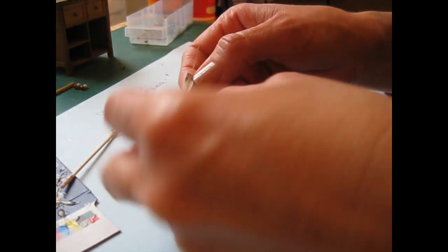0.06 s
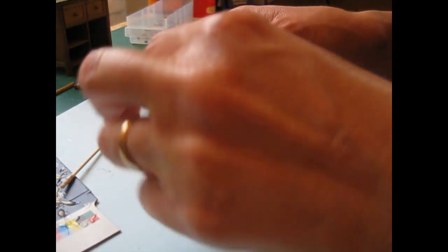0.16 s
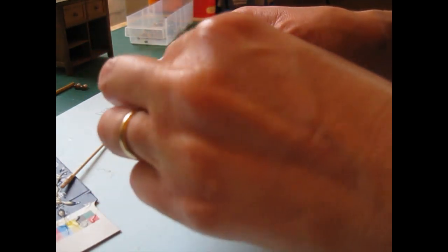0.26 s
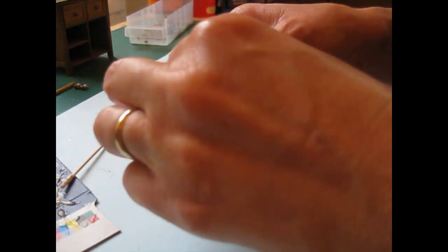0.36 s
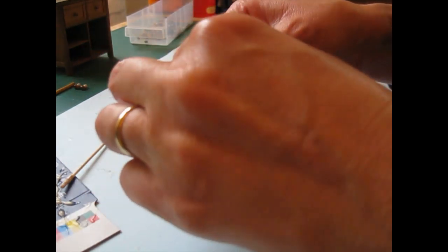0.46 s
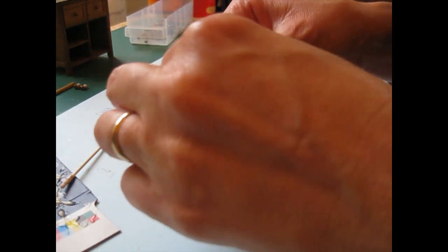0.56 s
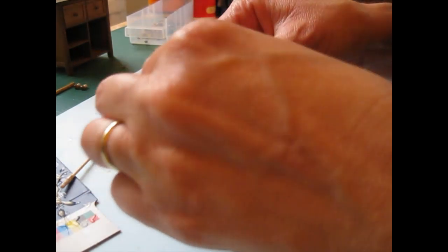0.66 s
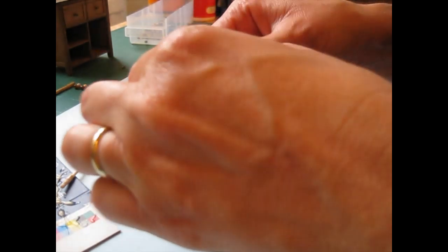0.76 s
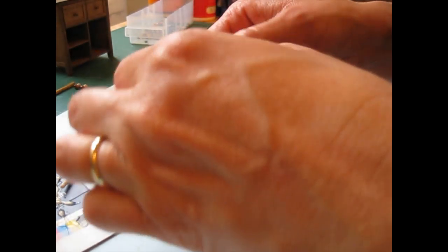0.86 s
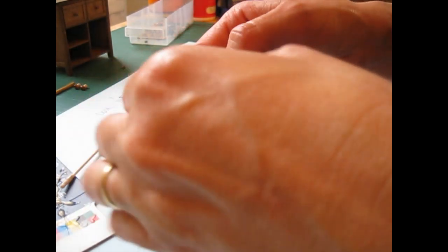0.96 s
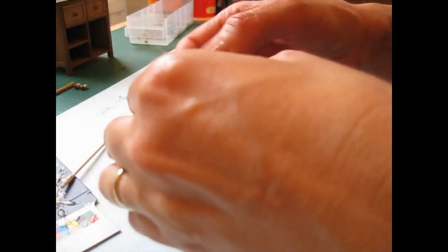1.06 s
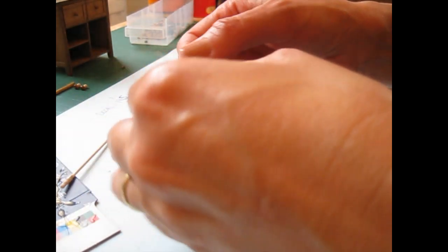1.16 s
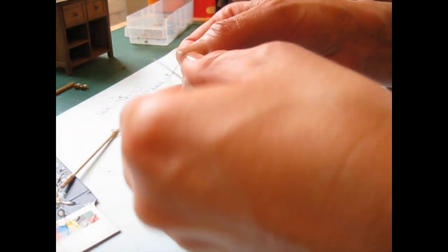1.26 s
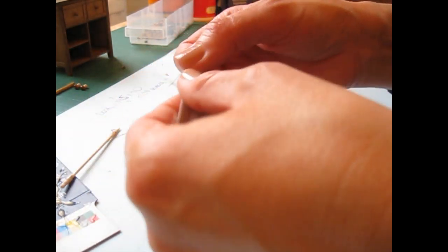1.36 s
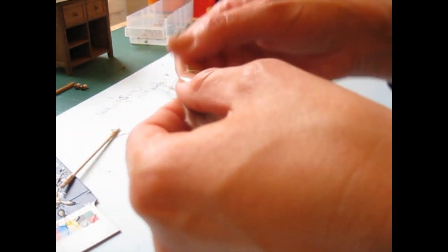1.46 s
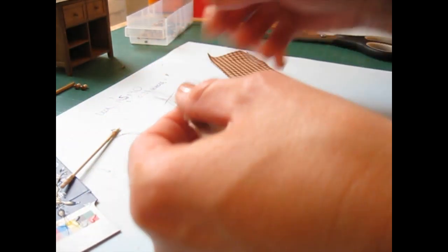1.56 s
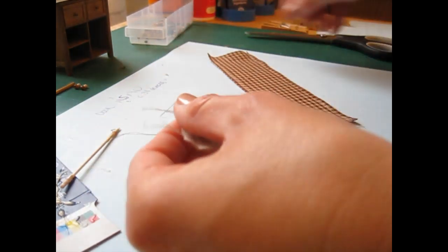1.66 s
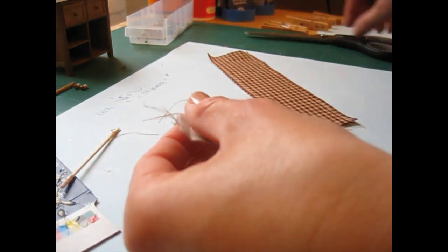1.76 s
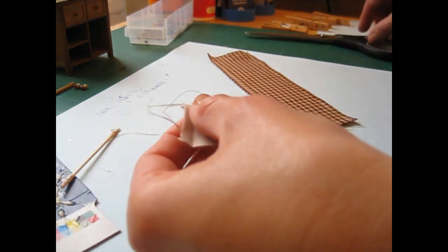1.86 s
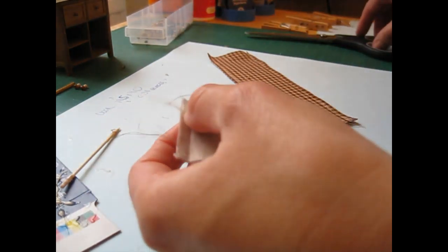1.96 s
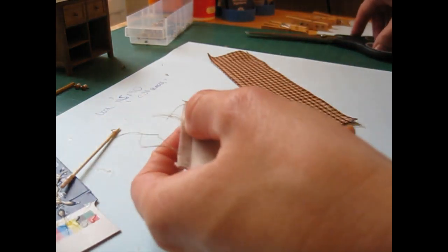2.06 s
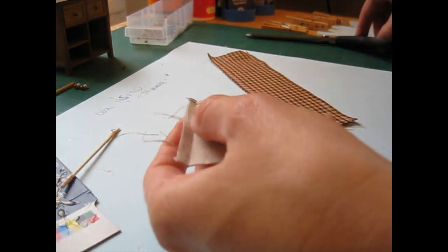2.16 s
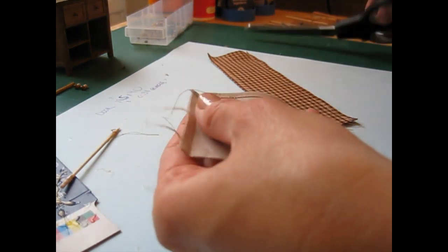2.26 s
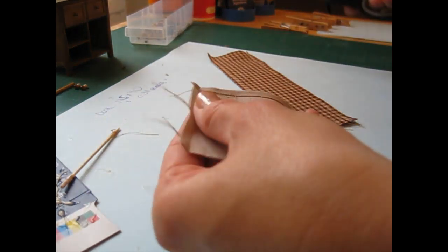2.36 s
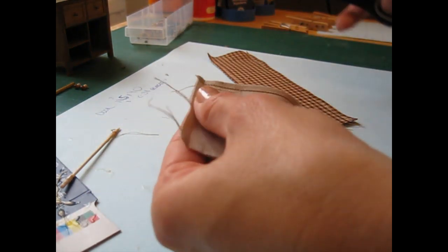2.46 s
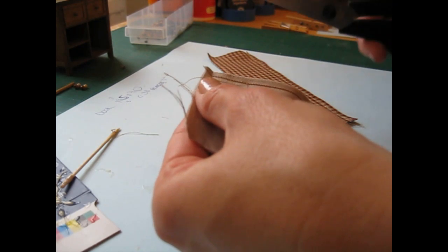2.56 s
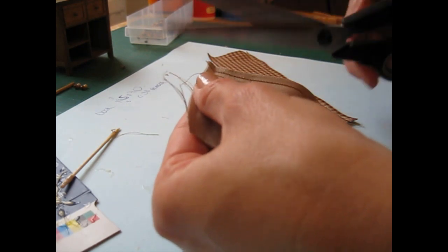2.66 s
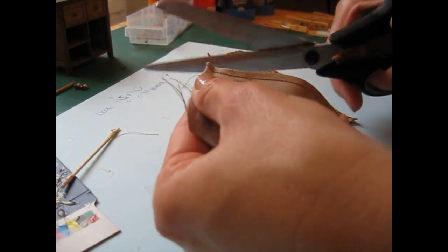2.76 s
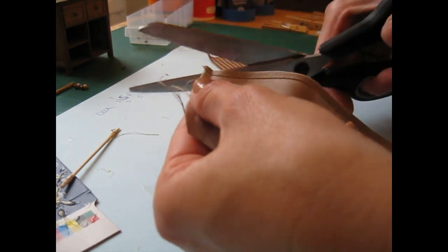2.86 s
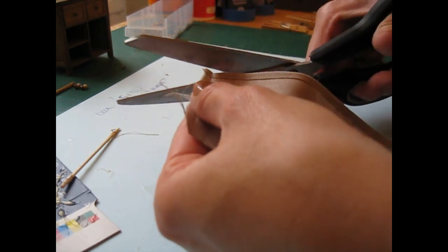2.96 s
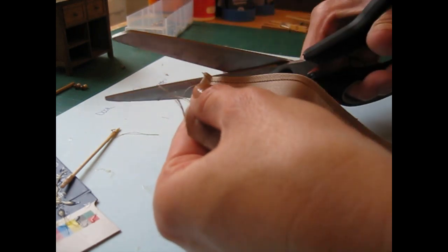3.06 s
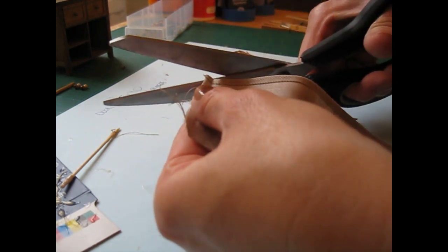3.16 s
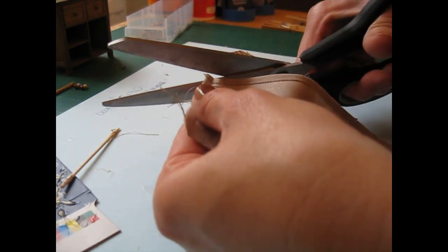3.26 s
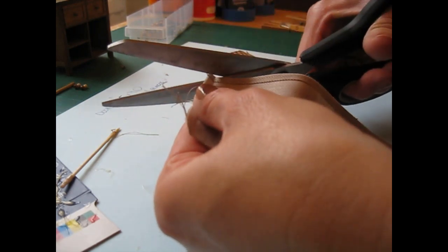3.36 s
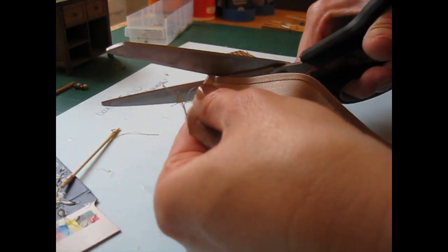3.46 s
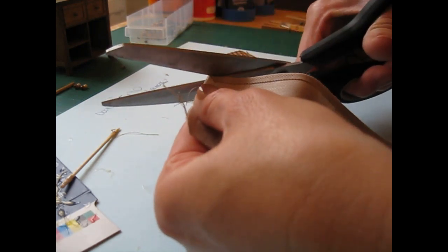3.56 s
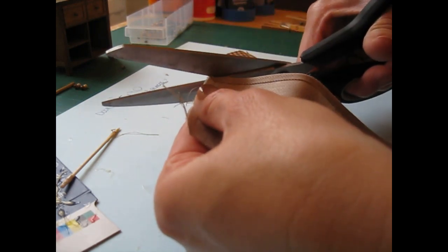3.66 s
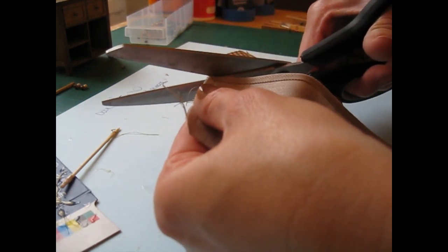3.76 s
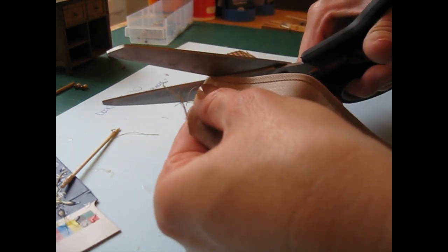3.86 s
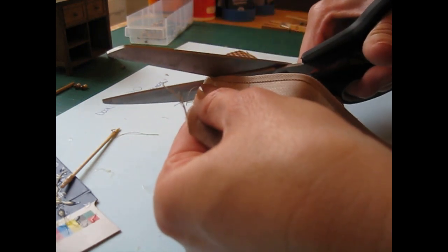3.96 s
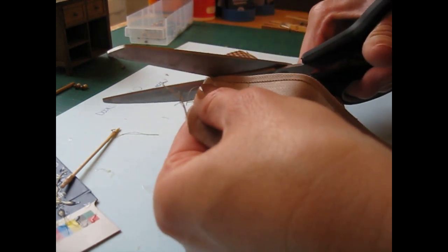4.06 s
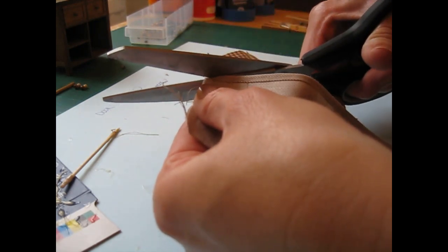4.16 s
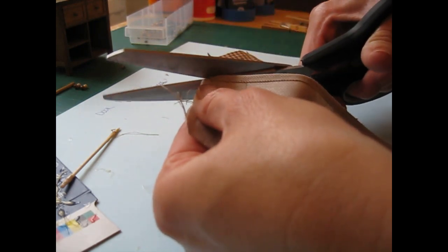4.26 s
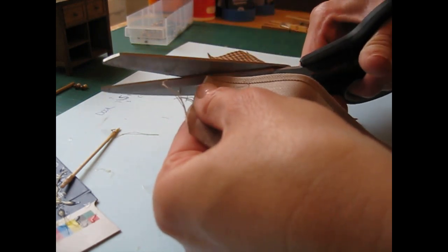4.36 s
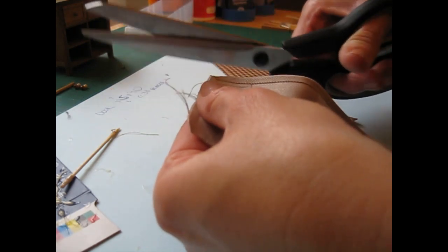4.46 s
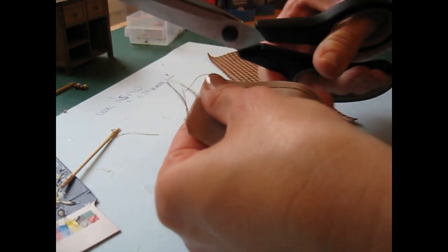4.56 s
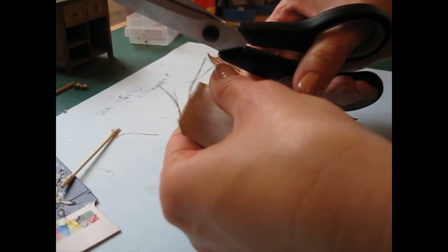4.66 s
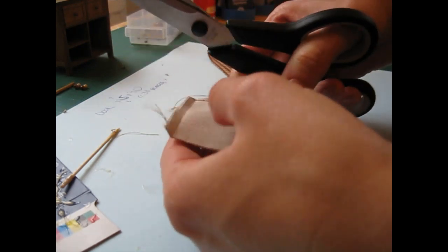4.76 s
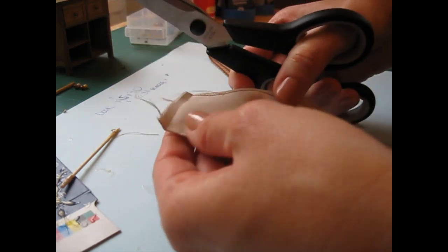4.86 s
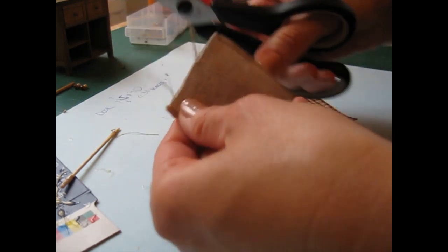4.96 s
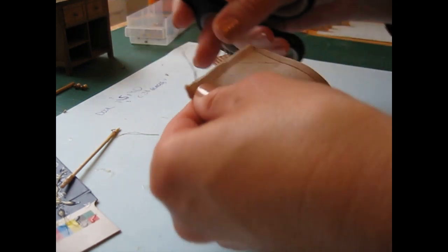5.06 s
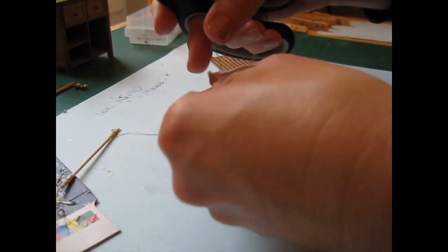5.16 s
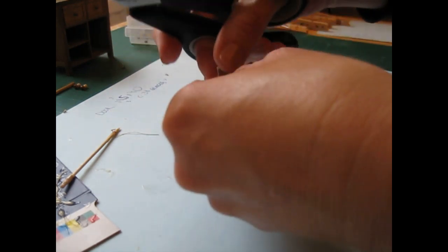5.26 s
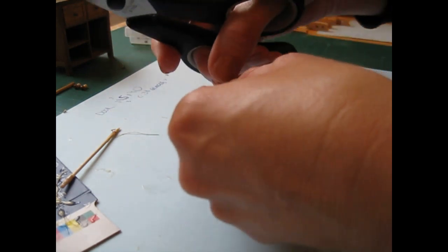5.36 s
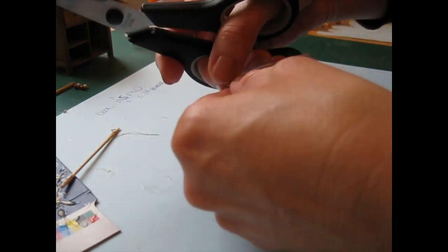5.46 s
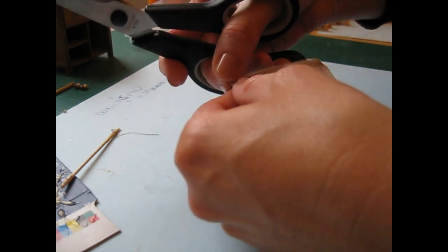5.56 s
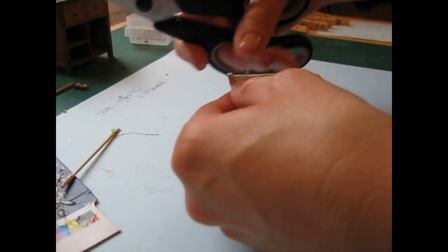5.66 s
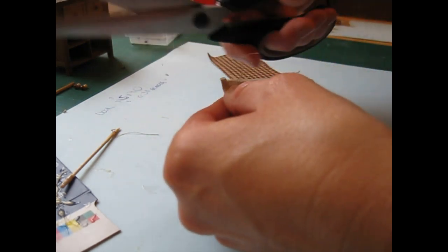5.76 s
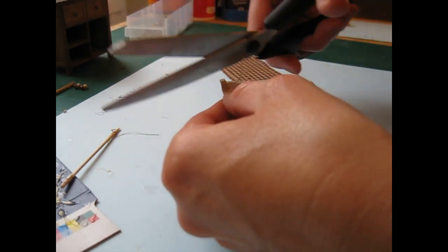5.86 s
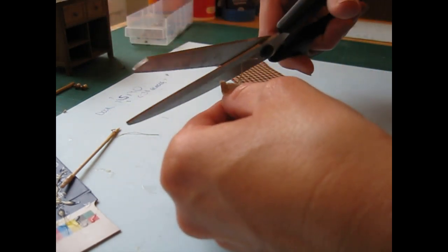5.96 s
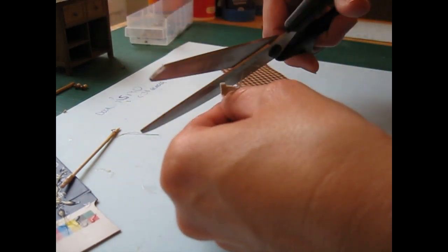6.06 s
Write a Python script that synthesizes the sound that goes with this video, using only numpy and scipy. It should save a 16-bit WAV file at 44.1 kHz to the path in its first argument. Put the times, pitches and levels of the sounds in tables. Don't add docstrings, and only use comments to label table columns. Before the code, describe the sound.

Barely audible fabric rustles and low sleeve rumbles come first, near the microphone. Then steel scissors rattle on a wooden desk, the last blow loudest, and part with a short gritty scrape. After a pause of hiss, the blades slide faintly through cloth, squeak upward and shut with a bright dry snap and small trailing clicks. Light handling continues, then a quick high reopening chirp. The small room adds only short, sparse reflections.

```python
import sys
import numpy as np
from scipy import signal
from scipy.io import wavfile
from scipy.ndimage import uniform_filter1d

SR = 44100
rng = np.random.default_rng(int(sys.argv[2]) if len(sys.argv) > 2 else 0)


def voltage_ratio(level):
    return 10 ** (np.asarray(level, float) / 20)


def dump(signal):
    limited = np.clip(np.atleast_2d(signal).T, -1, 1)
    pcm = np.round(limited * 32767).astype(np.int16)
    wavfile.write(sys.argv[1], SR, pcm)


N = 269892

# (time [s], level [dB], centre [Hz], blade ring [dB], overtone [dB])
SNAPS = [(4.426, -20, 6600, -30, -1), (4.42625, -12.5, 4900, -19, -20), (4.433, -31, 5600, -5, -16),
         (4.4345, -24, 4800, -7, -18), (4.4359, -24, 5400, -9, -20), (4.506, -33, 5200, -14, -8),
         (4.511, -28, 6500, -18, -8), (4.5112, -33, 4700, -9, -14), (4.535, -46, 6000, -25, 3),
         (4.6195, -43, 5200, -25, -3), (4.9394, -50, 3000, -20, -20), (5.05, -41.5, 2800, -22, -3),
         (5.0505, -48, 9000, -25, -3)]
# (time [s], level [dB], centre [Hz], blade ring [dB], overtone [dB])
CLATTER = [
    (1.9965, -31, 4600, -23, -6),
    (2.0507, -23, 4100, -22, -11),
    (2.0985, -24, 4540, -13, -20),
    (2.124, -44, 3500, -26, -10),
    (2.1275, -35.5, 2970, -24, -4),
    (2.152, -42, 2600, -12, -8),
    (2.178, -40, 2500, -20, 1),
    (2.2164, -15.5, 4300, -18, -12),
    (2.2178, -26.5, 5640, -15, 0),
    (2.229, -27.5, 4400, -10, -15),
]
# (frequency [Hz], level [dB], t60 [s])
BLADE_MODES = [(3530, 4, 0.049), (4020, -2, 0.036), (4840, -3, 0.041), (4650, 1, 0.22), (5450, -17, 0.043),
               (5900, -5, 0.085), (5900, 3.5, 0.059), (6000, -23, 0.048), (6450, 0, 0.074), (6900, -6, .06),
               (8800, -7, 0.065), (10200, -19, .05)]
# (time [s], level [dB], hardness [Hz], ring factor [1], desk-top boom [dB])
KNOCKS = [(1.843, -39.5, 450, 0.35, 8.5), (1.878, -47.5, 398, 0.97, 7), (1.997, -33.5, 1010, 0.58, -1.5),
          (2.022, -39, 1000, 0.44, -4), (2.050, -36, 1500, 0.91, 1), (2.075, -30.5, 1290, 0.87, -18),
          (2.098, -36, 1500, 0.77, -8), (2.1257, -33.5, 2200, 0.35, -20), (2.153, -42, 1500, 0.44, 0),
          (2.178, -37, 980, 0.96, -2), (2.2164, -15.5, 2960, 0.7, -13), (2.229, -25, 4000, 0.47, -14)]
# (frequency [Hz], level [dB], t60 [s])
DESK_MODES = [(302.3, -2, 0.32), (406, 1.5, 0.13), (459, -1.5, 0.21), (560, -6.5, .1), (700, -6, 0.085),
              (802, -6.5, 0.077), (892, -8, 0.12), (1016, -6.5, 0.18), (1188, -9.5, 0.35), (1380, -7, 0.14),
              (1600, -11, 0.066), (1710, -6.5, 0.085), (2020, -18, 0.13), (2200, -1.5, 0.067),
              (2480, -9, .075), (2870, -8, 0.067), (3320, -8, 0.15), (3820, -11, 0.2), (4450, -9, .1),
              (5260, -16, .1), (5900, -24, .1), (6800, -24, .1)]
# (frequency [Hz], level [dB], t60 [s])
BOOM_MODES = [(150.6, -3, 0.1), (234, -15, .08)]
# (time [s], level [dB],
# frequency [Hz], t60 [s])
TAPS = [(.63, -46, 1300, .055), (1.843, -44, 440.7, 0.022), (2.2, -49, 920, 0.03),
        (2.051, -32.5, 2150, .013), (2.08, -45, 301, .2), (2.08, -29.5, 987, 0.041),
        (2.124, -32, 1600, .012), (2.125, -36, 950, 0.021), (1.6, -46, 1030, .021),
        (2.2164, -15.5, 2350, .014), (2.217, -29, 460, .029), (2.2174, -21.5, 1600, 0.016),
        (2.219, -30.5, 560, 0.07), (2.222, -32.5, 301, 0.17), (2.549, -29, 546, 0.019),
        (2.702, -38, 1450, 0.08), (4.336, -46, 1300, .04), (4.5112, -37.5, 3100, 0.0069),
        (4.6195, -38, 2360, 0.0083)]
# (peak [s], rise [s], fall [s], level [dB], brightness [dB])
DRAGS = [
    (2.076, 0.021, 0.016, -33.5, 0.5),
    (2.103, .005, 0.025, -39.5, -4.5),
    (2.116, 0.0068, 0.016, -48, -2),
    (2.131, 0.0035, 0.018, -50, 0),
]
# (peak [s], rise [s], fall [s], level [dB], brightness [dB])
OPENS = [
    (2.69, 0.0084, 0.0097, -38, 0.92),
    (2.7, .012, 0.0088, -34.5, 1),
    (2.71, .01, 0.038, -47, -0.4),
]
# (peak [s], rise [s], fall [s], level [dB], brightness [dB])
REOPENS = [
    (5.826, .03, 0.03, -46, 0.91),
]
# (peak [s], rise [s], fall [s], level [dB], brightness [dB])
CUTS = [
    (3.955, 0.016, 0.025, -55.5, 0.2),
    (4.15, 0.021, 0.032, -54.5, 0.83),
    (4.197, 0.016, .036, -54.5, 0.5),
    (4.245, .025, 0.029, -56, 0.18),
    (4.28, .025, 0.029, -56.5, 1.4),
    (4.318, .022, 0.016, -47.5, 3.1),
]
# (peak [s], rise [s], fall [s], level [dB], brightness [dB])
RUBS = [ (0.016, 0.017, 0.15, -64, -4.5), (0.272, 0.06, .045, -54, -2.5), (0.545, 0.064, 0.068, -56.5, -2),
        (0.672, 0.025, .02, -65, 2), (1.3, 0.19, 0.24, -66.5, -9.5), (1.392, .014, 0.01, -58.5, 0),
        (1.49, 0.067, .03, -61, -1.5), (1.592, 0.063, 0.15, -58.5, -0.5), (1.985, 0.058, 0.013, -59.5, -5),
        (2.385, 0.028, 0.073, -58, 2.5), (2.43, 0.037, .035, -59.5, 6), (2.553, 0.027, 0.036, -50, 5.5),
        (2.59, 0.033, 0.13, -58.5, 6), (4.911, 0.19, 0.34, -65.5, -5), (5.019, 0.11, 0.048, -59.5, 7.5),
        (5.052, .02, 0.0063, -58, -6), (5.12, .05, 0.033, -68, -4), (5.62, .12, 0.09, -62, -2.5),
        (5.7, 0.064, 0.074, -67, 3)]
# (centre [Hz], width [Hz], level [dB])
DRAG_RING = [(930, 74, -3), (1940, 45, -3), (3770, 110, -4), (4400, 300, 4), (4750, 51, -1), (5540, 68, -6),
             (9420, 60, 0), (13000, 43, -25)]
OPEN_RING = [(1540, 180, -9), (2400, 370, 1), (3410, 180, 3), (4300, 110, -18), (8400, 100, -5),
             (11900, 150, -8), (15200, 120, -14)]
REOPEN_RING = [(1070, 200, -4), (3840, 300, -2), (4890, 250, 7), (6500, 120, 3.5), (10300, 150, -9),
               (13500, 150, -12)]
CUT_RING = [(1880, 420, 9), (4100, 250, 1), (5000, 400, 1), (6100, 350, 5), (7360, 60, -11), (8950, 90, -4),
            (10200, 90, -6), (12700, 50, -10), (13800, 190, -15), (15100, 43, -13)]
RUB_RING = [(1710, 1400, 1.5), (5180, 1100, -3), (12200, 2000, -5)]
# (start [s], length [s], from [Hz], to [Hz], level [dB])
SQUEAKS = [
    (3.832, .05, 6750, 6800, -64),
    (3.936, 0.04, 6540, 6980, -52.5),
    (4.133, .05, 7100, 7060, -57),
    (4.18, .05, 7150, 7350, -58),
    (4.223, 0.073, 7230, 7240, -56),
    (4.295, 0.032, 7600, 7850, -45),
]
# (start [s], length [s], from [Hz], to [Hz], level [dB])
CHIRPS = [
    (2.681, .016, 8800, 8400, -50),
    (2.691, 0.017, 12900, 15400, -41),
    (2.696, .016, 12000, 10940, -45),
    (2.714, 0.012, 9800, 8800, -49),
    (5.809, .013, 14800, 13300, -54),
    (5.821, 0.0096, 10900, 9680, -37.5),
]
# (start [s], length [s], from [Hz], to [Hz], level [dB])
GROANS = [
    (2.682, .022, 4300, 2140, -43.5),
    (2.69, .03, 2460, 1380, -40.5),
    (4.315, .017, 8650, 10100, -50),
]
# (peak [s], rise [s], fall [s], level [dB])
SHIFTS = [
    (0.022, 0.027, 0.051, -60),
    (0.4, 0.33, 0.17, -67),
    (1.178, 0.029, .02, -66),
    (1.55, .3, 0.29, -57.5),
    (1.851, .008, 0.12, -59),
]
# (frequency [Hz], level [dB])
HISS_COLOUR = [(25, -4.5), (80, -1), (250, 0.5), (700, -2), (1100, -3.5), (1600, -5), (3000, -8),
               (5500, -12), (9500, -15.5), (15500, -19.5)]
# (centre [Hz], width [Hz], level [dB])
WHINE = (15700, 60, -90)
# (centre [Hz], width [Hz], level [dB])
HUM = (1273, 220, -68)
# (swell depth [dB], roundness [1], body [dB], fizz [dB], swell share the body ignores [1])
RUB_FEEL = (18.5, 1, -3, -3.5, 0.5)
DRAG_FEEL = (27.5, 0.56, -4.5, -16, 0.4432)
OPEN_FEEL = (22, 1, -0.5, -3, 0)
CUT_FEEL = (13.5, 2.5, -4, -10, 0.14)


def evened(x):
    return x / np.sqrt(np.mean(x ** 2) + 1e-20)


def add(mix, start_s, sound):
    part = mix[round(start_s * SR):][:len(sound)]
    part += sound[:len(part)]


def band(x, lo_hz, hi_hz):
    sos = signal.butter(2, [lo_hz, min(hi_hz, 0.49 * SR)], "band", fs=SR, output="sos")
    return signal.sosfilt(sos, x)


def resonate(x, hz, width_hz):
    turn = np.exp(2j * np.pi * np.cumsum(hz * np.ones(len(x))) / SR)
    pole = np.exp(-np.pi * width_hz / SR)
    return 2 * (turn * signal.lfilter([1 - pole], [1, -pole], x / turn)).real


def smoothed(x, size, axis):
    return evened(uniform_filter1d(uniform_filter1d(x, size=size, axis=axis), size=size, axis=axis))


def unroll(rows):
    s, *columns = np.transpose(rows)
    t = np.arange(s[0], s[-1], 1 / SR)
    return s[0], [np.interp(t, s, c) for c in columns]


def swell(peak_s, rise_s, fall_s, depth_db, roundness=0.71):
    u = np.linspace(-1, 1, num=17)
    s = peak_s + u * np.where(u < 0, abs(rise_s), abs(fall_s))
    return np.maximum(s, 0), depth_db * abs(u) ** roundness


def ring(modes, factor, spread_db, rough):
    t = np.arange(SR // 5) / SR
    hz, db, t60 = np.transpose(modes)[:, :, None]
    db = db + spread_db * rng.standard_normal(hz.shape)
    a, b = (smoothed(v, 110, -1) for v in rng.standard_normal((2, len(modes), len(t))))
    depth = rough * np.minimum(hz / 760.0, 1) * np.minimum(t / 0.0014, 1)
    flutter = 1 + depth * (a + 1j * b)
    waves = (flutter * np.exp(2j * np.pi * hz * t)).imag
    return (voltage_ratio(db - 60 * t / (t60 * factor)) * waves).sum(0)


def tick(s, db, hz, ring_db, over_db):
    t60 = 0.0028
    crack = tap(s, 0, hz, t60)[1] + tap(s, over_db, 1.76 * hz, 0.61 * t60)[1]
    blades = ring(BLADE_MODES, 0.64, spread_db=4.0, rough=1.6)[:len(crack)]
    return s, voltage_ratio(db) * (crack / abs(crack).max() + voltage_ratio(ring_db) * blades / abs(blades).max())


def knock(s, db, hard_hz, factor, boom_db):
    wood = ring(DESK_MODES, factor, spread_db=1.5, rough=1.36)
    t = np.arange(len(wood)) / SR
    rattle = rng.standard_normal(len(wood)) * voltage_ratio(-60 * t / (0.11 * factor))
    wood = wood / abs(wood).max() + voltage_ratio(-4.0) * rattle
    wood = signal.lfilter(*signal.butter(2, hard_hz, fs=SR), wood)
    boom = ring(BOOM_MODES, 0.65, spread_db=1.5, rough=1.5)
    return s, voltage_ratio(db) * band(wood / abs(wood).max() + voltage_ratio(boom_db) * boom, 150.0, 11000.0)


def tap(s, db, hz, t60):
    t = np.arange(SR // 5) / SR
    return s, voltage_ratio(db - 60 * t / t60) * np.sin(2 * np.pi * hz * t) * np.minimum(t * hz / 1.77, 1)


def pressure(row, feel):
    *shape, db, bright_db = row
    depth_db, roundness, body_db, fizz_db, ignored = feel
    s, under_db = swell(*shape, depth_db, roundness)
    body = body_db - bright_db + ignored * under_db
    return np.transpose([s, db - under_db, body, fizz_db + bright_db + 0 * s])


def stroke(row, feel, peaks, grain_db, ring_db, top_hz=21000, low_hz=800):
    s, (level_db, body_db, fizz_db) = unroll(pressure(row, feel))
    lead = 2000
    n = len(level_db) + lead
    sizes = np.minimum(rng.exponential(1, n // 24 + 1), 3)
    slips = rng.standard_normal(n) * voltage_ratio(grain_db * np.repeat(sizes, 24)[:n])
    rung = sum(voltage_ratio(db) * evened(resonate(slips, hz, width_hz)) for hz, width_hz, db in peaks)
    slips = evened(slips) + voltage_ratio(ring_db) * rung
    limits_hz = (low_hz, 3000), (3000, 7500), (8000, top_hz)
    body, mid, fizz = (evened(band(slips, lo, hi)[lead:]) for lo, hi in limits_hz)
    sound = voltage_ratio(level_db) * (mid - voltage_ratio(body_db) * body - voltage_ratio(fizz_db) * fizz)
    return s, sound * signal.windows.tukey(len(sound), min(0.0027 * SR / len(sound), 1))


def glide(start_s, length_s, from_hz, to_hz, db, swell_db):
    half_s = length_s / 2
    s, under_db = swell(start_s + half_s, half_s, half_s, swell_db, roundness=2.5)
    return np.transpose([s, np.linspace(from_hz, to_hz, len(s)), db - under_db])


def squeak(row, swell_db, width_hz):
    s, (hz, db) = unroll(glide(*row, swell_db))
    lead = 600
    noise = rng.standard_normal(len(hz) + lead)
    whistle = resonate(noise, np.pad(hz, (lead, 0), "edge"), width_hz)[lead:]
    return s, voltage_ratio(db) * evened(whistle)


def shift(peak_s, rise_s, fall_s, level_db):
    s, under_db = swell(peak_s, rise_s, fall_s, depth_db=13)
    start_s, (db,) = unroll(np.transpose([s, level_db - under_db]))
    rumble = evened(band(rng.standard_normal(len(db)), 180.0, 720.0))
    return start_s, voltage_ratio(db) * rumble * signal.windows.tukey(len(db), 0.1)


def room(x, first_s=0.006):
    t60 = 0.17
    at = np.arange(round(first_s * SR), SR // 3, 20)
    taps = np.zeros(SR // 2)
    signs = rng.choice([-1.0, 1.0], len(at))
    taps[at + rng.integers(0, 20, len(at))] = signs * voltage_ratio(-60 * at / SR / t60)
    taps = signal.lfilter(*signal.butter(1, 6000.0, fs=SR), taps)
    return signal.fftconvolve(x, taps / np.linalg.norm(taps))[:N]


def hiss():
    bin_hz = np.fft.rfftfreq(1024, 1 / SR)
    a, b, patches = rng.standard_normal((N // 256 + 5, 513, 3)).T
    patches = evened(uniform_filter1d(uniform_filter1d(patches, size=14, axis=0), size=14, axis=1))
    hz, db = np.transpose(HISS_COLOUR)
    colour_db = np.interp(np.log(bin_hz + 1), np.log(hz), db)[:, None]
    spectrum = (a + 1j * b) * voltage_ratio(colour_db + 0.79 * patches)
    air = signal.istft(spectrum, nperseg=1024, noverlap=768)[1][:N]
    noise = rng.standard_normal(N)
    tones = 0
    for hz, width_hz, db in (HUM, WHINE):
        tones = tones + voltage_ratio(db) * evened(resonate(resonate(noise, hz, width_hz), hz, width_hz))
    return voltage_ratio(-55) * evened(air) + tones


def scene():
    rubs, hits, snaps = np.zeros((3, N))
    for row in SNAPS:
        add(snaps, *tick(*row))
    for row in CLATTER:
        add(rubs, *tick(*row))
    for row in KNOCKS:
        add(hits, *knock(*row))
    for row in TAPS:
        add(hits, *tap(*row))
    for row in DRAGS:
        add(rubs, *stroke(row, DRAG_FEEL, DRAG_RING, grain_db=5.0, ring_db=-12.0, top_hz=14000.0))
    for row in OPENS:
        add(rubs, *stroke(row, OPEN_FEEL, OPEN_RING, grain_db=1.0, ring_db=-5.5, low_hz=1250.0))
    for row in REOPENS:
        add(rubs, *stroke(row, OPEN_FEEL, REOPEN_RING, grain_db=1.7, ring_db=-16.0,
                          top_hz=14300.0, low_hz=550.0))
    for row in CUTS:
        add(rubs, *stroke(row, CUT_FEEL, CUT_RING, grain_db=1.8, ring_db=-8.5))
    for row in RUBS:
        add(rubs, *stroke(row, RUB_FEEL, RUB_RING, grain_db=2.4, ring_db=1.5, top_hz=16000.0))
    for row in SQUEAKS:
        add(rubs, *squeak(row, swell_db=14, width_hz=49.0))
    for row in CHIRPS:
        add(rubs, *squeak(row, swell_db=7, width_hz=160))
    for row in GROANS:
        add(rubs, *squeak(row, swell_db=7, width_hz=620))
    for row in SHIFTS:
        add(rubs, *shift(*row))
    direct = rubs + hits + snaps
    reflected = voltage_ratio(-12.0) * room(hits) + voltage_ratio(-16.0) * room(rubs) + voltage_ratio(-15.5) * room(snaps, first_s=0.007)
    return (direct + reflected + hiss())[None]


def roll_off(x):
    return signal.sosfilt(signal.butter(12, 16610, fs=SR, output="sos"), x)


def record(dry):
    notch_hz, notch_width_hz, edge_hz = 7850, 1420, 15800
    notched = signal.lfilter(*signal.iirnotch(notch_hz, notch_hz / notch_width_hz, SR), dry)
    low_pass = signal.firwin(801, edge_hz, window=("kaiser", 7), fs=SR)
    mix = signal.oaconvolve(notched, low_pass[None], "same")
    return roll_off(mix)


dry = scene()
out = record(dry)
dump(out)
```